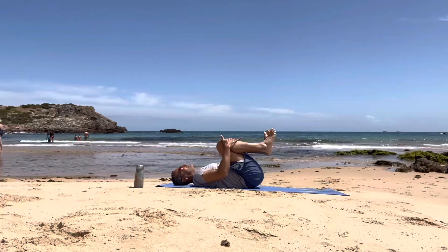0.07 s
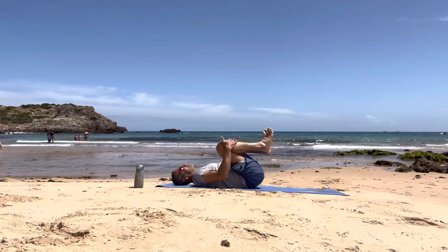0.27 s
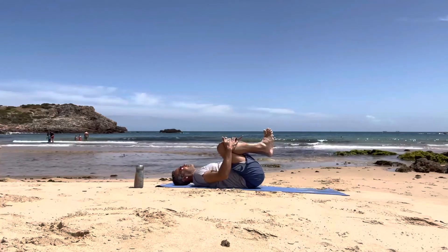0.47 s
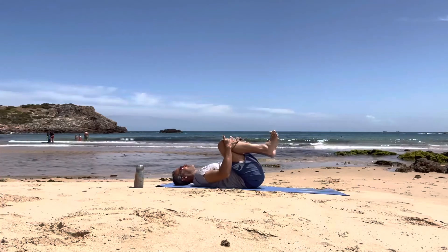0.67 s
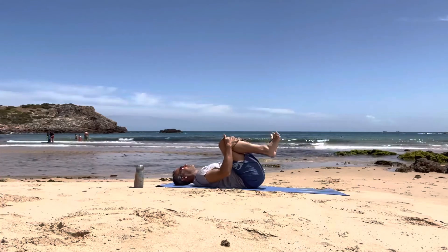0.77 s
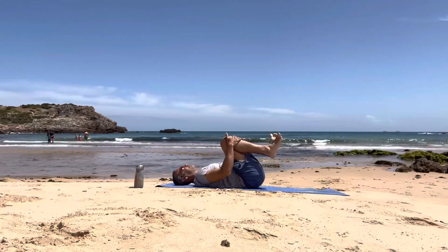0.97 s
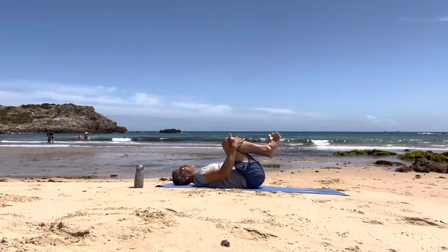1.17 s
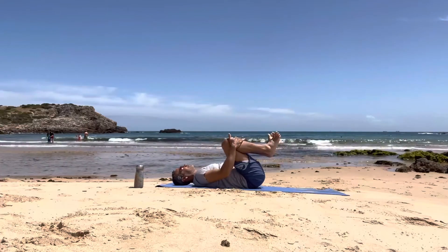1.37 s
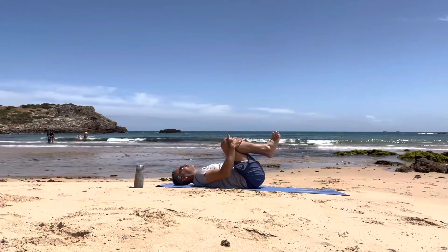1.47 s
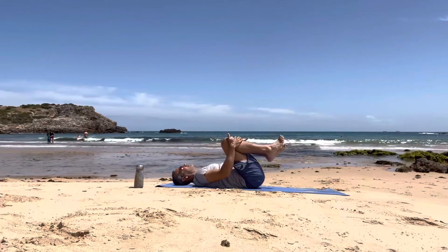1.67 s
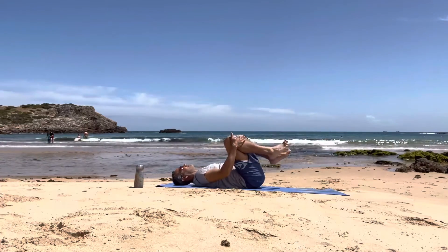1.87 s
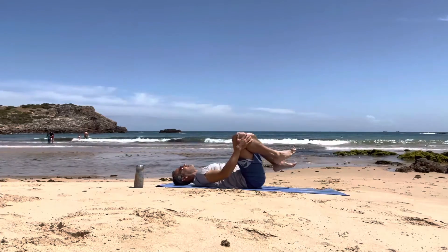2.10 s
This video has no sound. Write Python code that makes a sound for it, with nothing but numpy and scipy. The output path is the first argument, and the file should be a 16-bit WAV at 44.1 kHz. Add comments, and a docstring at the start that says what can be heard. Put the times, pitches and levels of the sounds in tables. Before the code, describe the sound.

Ocean surf on a sandy beach, a steady soft rush with a wave breaking near the end

```python
"""Surf on a sandy beach, some way off: a moment of near silence, then the sound cuts in abruptly.
Over the even rush of the sea, a spent wave hisses up the sand and fades, then the next one breaks:
its foam fizzes first, its low roar swells after, and a deep rumble follows as the crest collapses.
Small tumbles, slaps, splashes and tiny bubbles add detail, and a light wind buffets the microphone.
Most sounds are noise shaped in pitch and loudness; the bubbles are short dying tones."""
import sys
import numpy as np
from scipy import signal
from scipy.fft import rfft, irfft, next_fast_len
from scipy.io import wavfile
from scipy.ndimage import uniform_filter1d, map_coordinates

SR = 44100
rng = np.random.default_rng(int(sys.argv[2]) if len(sys.argv) > 2 else 0)


def master(y):
    """Save y as 16-bit WAV."""
    cut = np.clip(np.atleast_2d(y).T, -1, 1)
    pcm = np.round(cut * 32767)  # scale
    wavfile.write(sys.argv[1], SR, pcm.astype(np.int16))


N = 94153  # length in samples


def amp(db):
    """Turn decibels into a gain."""
    return 10 ** (np.asarray(db) / 20)


def unit(x):
    """Scale a sound to an average (rms) strength of 1."""
    return x / np.sqrt(np.mean(x ** 2) + 1e-20)


def clock():
    """Give the time of every sample in seconds."""
    return np.arange(N) / SR


def curve(rows):
    """Join (time in seconds, value) points by straight lines."""
    return np.interp(clock(), *np.transpose(rows))


def wobble(rate):
    """Draw a smooth random curve through rate random points a second."""
    return map_coordinates(rng.standard_normal(400), [clock() * rate], mode="mirror")


def swell(s, width):
    """Rise and fall smoothly as a bell curve around time s; width is its standard deviation (s)."""
    return np.exp(-.5 * ((clock() - s) / width) ** 2)


def filtered(x, response):
    """Multiply each frequency of a sound by the gain that response gives for it."""
    m = next_fast_len(N + 8192)  # spare room keeps the end from wrapping onto the start
    gain = response(np.fft.rfftfreq(m, 1 / SR))
    return irfft(rfft(x, m) * gain, m)[:N]


def rush(spectrum, patchy_db):
    """Make noise of rms 1 with the given spectrum and random louder and softer patches."""
    z = signal.stft(rng.standard_normal(N), nperseg=512)[2]
    # smooth a random field over frequency, then over time
    field = uniform_filter1d(rng.standard_normal(z.shape), size=7, axis=0)
    field = uniform_filter1d(field, size=16, axis=1, mode="wrap")
    patches = amp(patchy_db * unit(field))
    noise = signal.istft(z * patches, nperseg=512)[1][:N]
    hz, db = np.transpose(spectrum)

    def response(f):
        """Join the spectrum's points by straight lines over log frequency."""
        return amp(np.interp(np.log(f + 1), np.log(hz + 1), db))

    return unit(filtered(noise, response))


def sea():
    """Many far waves merge into an even, slightly restless rush."""
    # tone of the sea: pitch_hz [Hz], relative level_db [dB per Hz]
    sea_spectrum = [(30, -11), (100, -2.5), (190, -3), (420, -0.5), (750, -3), (1100, -2), (1400, -6.5),
                    (1900, -8), (3000, -14.5), (5000, -21.5), (7500, -29), (12000, -34), (14000, -40.5),
                    (15500, -51)]
    level_db = -49 + 0.25 * wobble(12.96)
    return amp(level_db) * rush(sea_spectrum, patchy_db=0.5)


def wind():
    """Gusts push slow eddies across the microphone, and brief ones bump it."""
    # tone of the buffeting: pitch_hz [Hz], relative level_db [dB per Hz]
    buffet_spectrum = [(2, -17.5), (8, 3), (14, -9.5), (24, -3.5), (35, -12.5), (55, -17), (80, -25),
                       (120, -44), (300, -64), (1500, -100)]
    # wind strength: time_s [s], level_db [dB]
    wind_level = [(.25, -48.5), (.46, -54), (.54, -45.5), (.8, -47.5), (1.0, -42.5), (1.2, -41),
                  (1.44, -50), (1.58, -36), (1.76, -54), (1.87, -45.5), (2.13, -44.5)]
    # eddies that bump the microphone: peak_s [s], level_db [dB]
    bump_events = [(.335, -51), (.68, -55), (.73, -50), (1.062, -48), (1.165, -46), (1.4, -48.5),
                   (1.58, -61), (1.86, -55), (2.1, -46)]
    # tone of a bump: pitch_hz [Hz], relative level_db [dB per Hz]
    bump_spectrum = [(15, -9), (42, 4), (65, -1.5), (100, -12), (200, -38), (800, -70)]
    bump_width_s = 0.014
    gusts = amp(curve(wind_level) + 0.41 * wobble(14)) * rush(buffet_spectrum, patchy_db=0.77)
    bump_strength = sum(amp(db) * swell(s, bump_width_s) for s, db in bump_events)
    return gusts + bump_strength * rush(bump_spectrum, patchy_db=-1.6)


def tumbles():
    """Small waves fold over at the water's edge, each with a short soft rush at its own pitch."""
    # small waves: peak_s [s], width_s [s], level_db [dB], pitch_hz [Hz]
    tumble_events = [(0.301, 0.022, -49, 830), (0.498, .018, -51.5, 680), (0.715, 0.016, -53.5, 600),
                     (1.162, 0.031, -50, 520), (1.303, 0.024, -50.5, 490), (1.55, 0.021, -56, 596),
                     (1.672, .02, -52.5, 700)]
    # tone of a tumble: multiple of its pitch [times], relative level_db [dB per Hz]
    tumble_spectrum = [(.1, -20), (.45, 0), (1, 3.5), (1.7, -3), (4, -22), (15, -46)]
    total = np.zeros(N)
    for s, width, db, hz in tumble_events:
        spectrum = [(k * hz, d) for k, d in tumble_spectrum]
        total += amp(db) * swell(s, width) * rush(spectrum, patchy_db=0.7)
    return total


def slaps():
    """Thin sheets of water slap down in short bursts of noise, each with its own pitch."""
    # slapping sheets: peak_s [s], width_s [s], level_db [dB], pitch_hz [Hz]
    slap_events = [(0.35, 0.015, -58.5, 2100), (.46, 0.023, -58, 1940), (.645, 0.0087, -56, 1150),
                   (.745, 0.022, -56.5, 1690), (0.998, 0.026, -54.5, 1340), (1.135, 0.056, -61.5, 2560),
                   (1.522, .018, -56, 2010), (1.729, 0.027, -52, 1200), (2.115, 0.011, -51, 1150)]
    # tone of a slap: multiple of its pitch [times], relative level_db [dB per Hz]
    slap_spectrum = [(.2, -27), (.6, -8), (.85, 4.5), (1.15, 0.5), (1.7, -16), (3, -20), (7, -40)]
    total = np.zeros(N)
    for s, width, db, hz in slap_events:
        spectrum = [(k * hz, d) for k, d in slap_spectrum]
        total += amp(db) * swell(s, width) * rush(spectrum, patchy_db=0.4)
    return total


def spray():
    """Flung water lands in very brief bright splashes of noise."""
    # splashes: peak_s [s], level_db [dB], pitch_hz [Hz]
    splash_events = [(0.261, -53, 4500), (0.288, -65, 9000), (.319, -62, 7200), (0.322, -54, 4700),
                     (.335, -61.5, 10000), (.3775, -58, 4500), (.4, -63, 8800), (.66, -57, 4000),
                     (0.704, -64, 9800), (.736, -66, 7450), (1.485, -61, 4400), (1.695, -57, 4500),
                     (1.966, -64, 9000)]
    # tone of a splash: multiple of its pitch [times], relative level_db [dB per Hz]
    splash_spectrum = [(.2, -26), (.6, 2), (.9, 5), (1.05, 5), (1.25, -3), (1.6, -22), (3, -36)]
    splash_width_s = 0.00099
    total = np.zeros(N)
    for s, db, hz in splash_events:
        spectrum = [(k * hz, d) for k, d in splash_spectrum]
        total += amp(db) * swell(s, splash_width_s) * rush(spectrum, patchy_db=4.0)
    return total


def bubbles():
    """Countless tiny bubbles ring for a few cycles and give the hiss its grain."""
    bubbles_per_s, middle_hz, pitch_spread = 900, 3000, 0.38  # spread in natural-log units
    ring_cycles, scatter_db = 2.3, 6  # cycles to fade by 60 dB; typical difference in loudness
    count = int(bubbles_per_s * N / SR)
    when, size = rng.random((2, count, 1))
    hz = middle_hz * np.exp(pitch_spread * rng.standard_normal((count, 1)))
    hz = np.clip(hz, 600, 13000)
    k = np.arange(256)  # samples in each ring
    cycles = hz * k / SR
    # a few bubbles are much louder than most, and lower ones tend to be louder
    loudness = amp(-scatter_db * np.log(1 - .99 * size)) * np.sqrt(middle_hz / hz)
    fade = np.exp(-np.log(1000) * cycles / ring_cycles)
    rings = loudness * np.sin(2 * np.pi * cycles) * fade
    # add every ring at its own random time
    places = (when * N).astype(int) + k
    total = np.bincount(places.ravel(), rings.ravel(), N)[:N]
    return amp(-67) * unit(total)


def wash():
    """Each sheet of water hisses up the sand with a fine sizzle that swells and fades with it."""
    # sheets of water: peak_s [s], width_s [s], hiss level_db [dB], sizzle level_db [dB]
    wash_events = [(0.282, 0.28, -61, -90), (0.743, 0.034, -66.5, -83), (0.907, 0.15, -58.5, -78),
                   (1.535, 0.093, -60, -88), (1.745, 0.056, -64.5, -79)]
    # tone of water washing up the sand: pitch_hz [Hz], relative level_db [dB per Hz]
    wash_spectrum = [(500, -31), (1100, 7), (1700, 10.5), (2600, 0), (3400, 5), (4100, 6), (5000, 1),
                     (6500, -8), (8500, -24), (15500, -45)]
    # fine high sizzle over the hiss: pitch_hz [Hz], relative level_db [dB per Hz]
    sizzle_spectrum = [(8000, -30), (10500, -6), (12200, 0), (13500, -4), (15500, -15)]
    hiss = sum(amp(db) * swell(s, width) for s, width, db, _ in wash_events)
    sizzle = sum(amp(db) * swell(s, width) for s, width, _, db in wash_events)
    return hiss * rush(wash_spectrum, patchy_db=2.0) + sizzle * rush(sizzle_spectrum, patchy_db=1.0)


def foam():
    """Fresh foam fizzes high above the roar."""
    # tone of the foam: pitch_hz [Hz], relative level_db [dB per Hz]
    foam_spectrum = [(2000, -20), (5500, -12), (7200, -1), (8500, 5.5), (9600, 3.5), (10600, -4),
                     (11800, -3), (13500, -18), (15500, -15)]
    # foam strength: time_s [s], level_db [dB]
    foam_level = [(.25, -78), (.34, -74.5), (.52, -80.5), (1.28, -88), (1.45, -71.5), (1.58, -75),
                  (1.7, -67), (1.9, -69.5), (2.13, -68)]
    return amp(curve(foam_level) + 0.38 * wobble(20)) * rush(foam_spectrum, patchy_db=2.1)


def breaker():
    """The roar grows as more of the crest tumbles over; its collapse adds a deep churning rumble."""
    # tone of the breaking wave's roar: pitch_hz [Hz], relative level_db [dB per Hz]
    roar_spectrum = [(40, -17), (110, -5.5), (280, -1.5), (450, 0), (600, 3.5), (900, -2), (1400, -6.5),
                     (2700, -13), (5000, -24), (12000, -57)]
    # deep rumble of the collapsing crest: pitch_hz [Hz], relative level_db [dB per Hz]
    rumble_spectrum = [(40, -11), (100, -1), (155, -4.5), (210, 1.5), (310, -6.5), (480, -7.5), (750, -18),
                       (3000, -60)]
    break_s, crest_s, rise_db = 1.44, 1.915, 9  # the roar rises by rise_db between these times
    collapse_s, collapse_width_s = 2.064, .11
    rise = curve([(0, -35), (break_s, -rise_db), (crest_s, 0)])
    roar = amp(-47 + rise + 0.55 * wobble(16)) * rush(roar_spectrum, patchy_db=-0.2)
    churn = amp(-51 + 2 * wobble(35)) * swell(collapse_s, collapse_width_s)
    return roar + churn * rush(rumble_spectrum, patchy_db=0.7)


def scene():
    """Add sea, wind and waves at one microphone."""
    background = sea() + wind()
    small_sounds = tumbles() + slaps() + spray() + bubbles()
    waves = wash() + foam() + breaker()
    return (background + small_sounds + waves)[None]


def record(dry):
    """Cut the sound in over faint electronic noise and drop everything above the top frequency."""
    # faint hum and hiss of the electronics: pitch_hz [Hz], relative level_db [dB per Hz]
    idle_spectrum = [(20, 3.5), (60, -13), (150, -20), (400, -27), (1500, -29.5), (13500, -31),
                     (15000, -43)]
    start_s, fade_in_s, top_hz = .251, 0.0036, 15500
    opened = np.clip((clock() - start_s) / fade_in_s, 0, 1)
    idle = amp(-88) * rush(idle_spectrum, patchy_db=0.6)
    return filtered(dry[0] * opened + idle, lambda hz: hz < top_hz)[None]


dry = scene()
out = record(dry)
master(out)
```